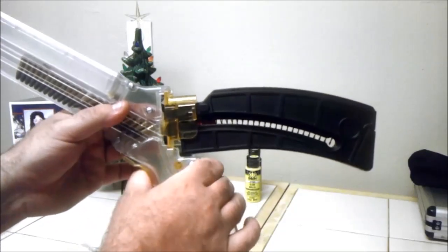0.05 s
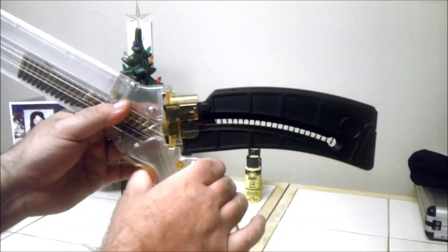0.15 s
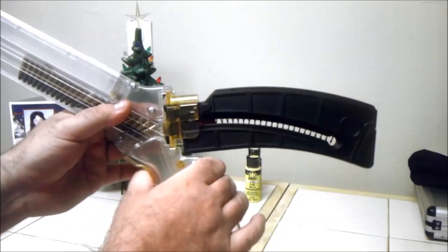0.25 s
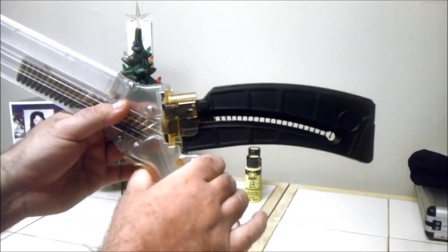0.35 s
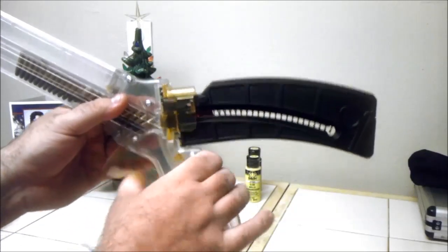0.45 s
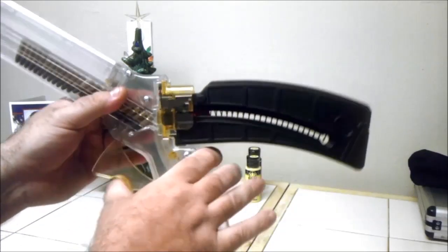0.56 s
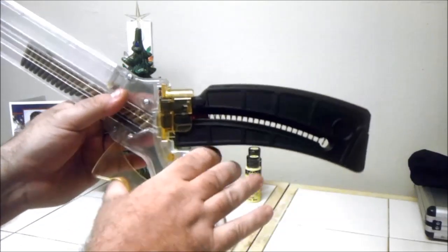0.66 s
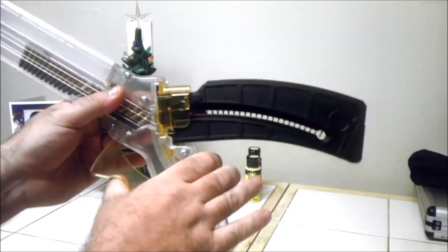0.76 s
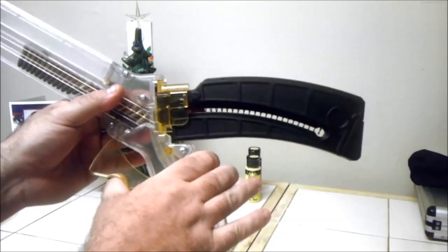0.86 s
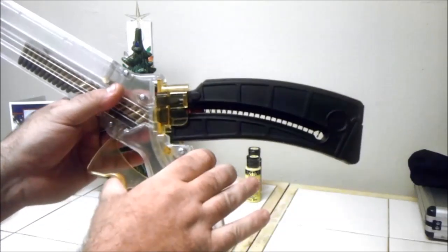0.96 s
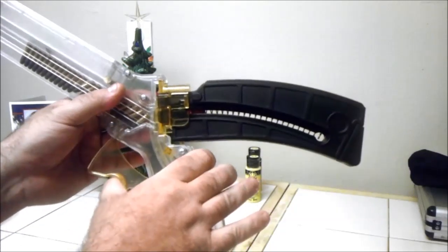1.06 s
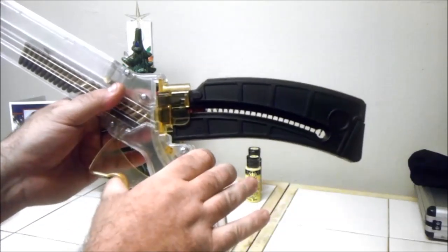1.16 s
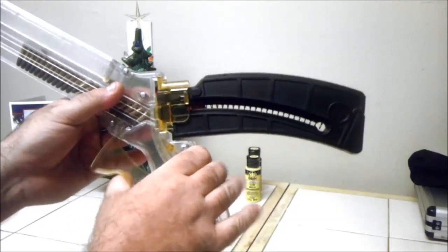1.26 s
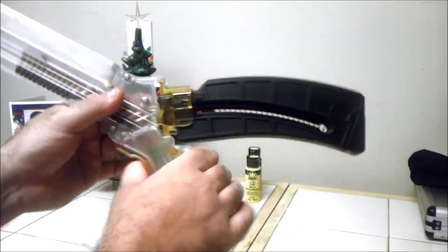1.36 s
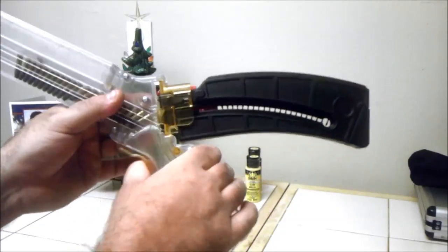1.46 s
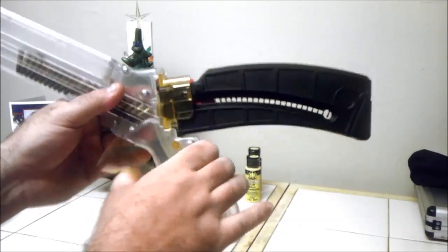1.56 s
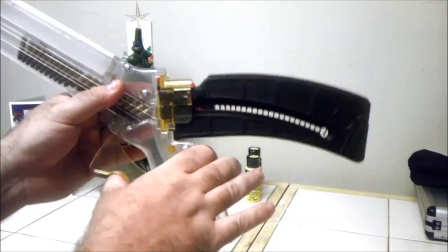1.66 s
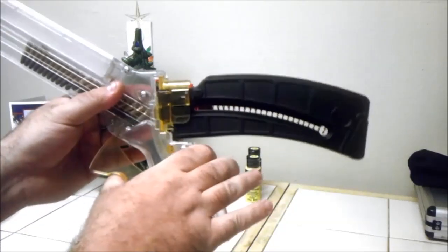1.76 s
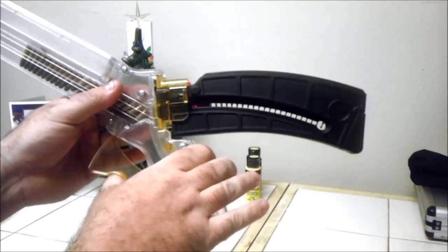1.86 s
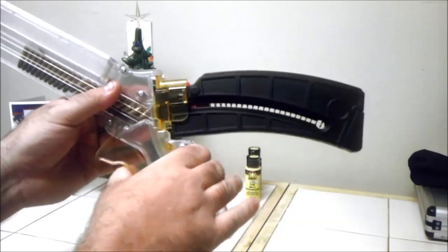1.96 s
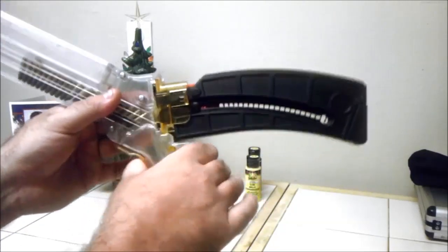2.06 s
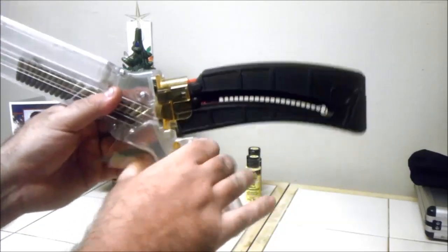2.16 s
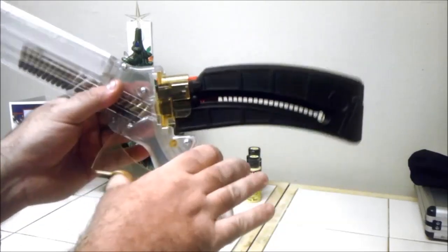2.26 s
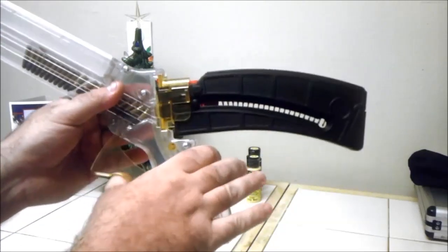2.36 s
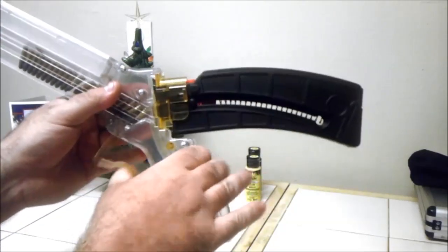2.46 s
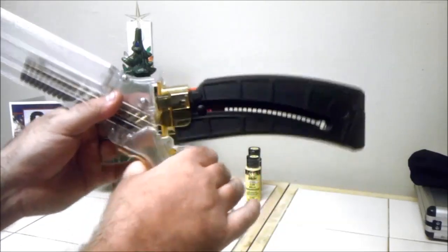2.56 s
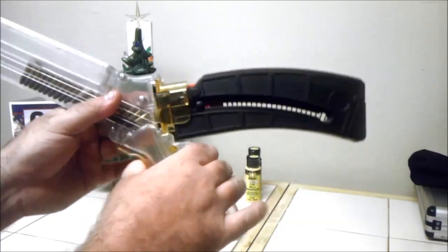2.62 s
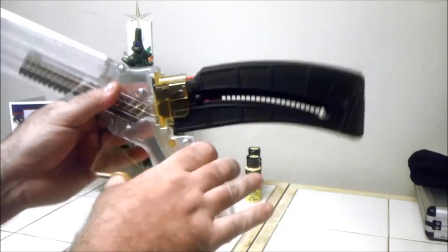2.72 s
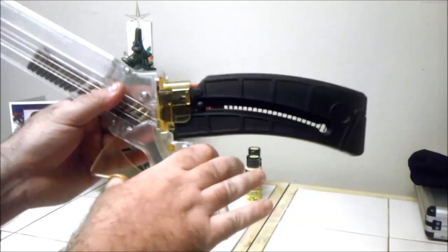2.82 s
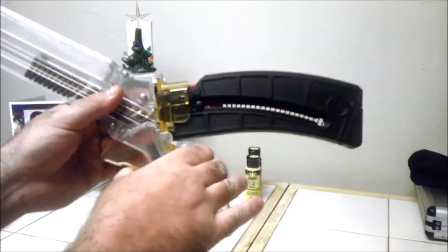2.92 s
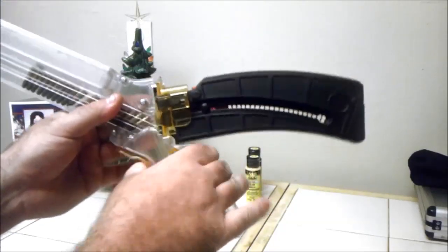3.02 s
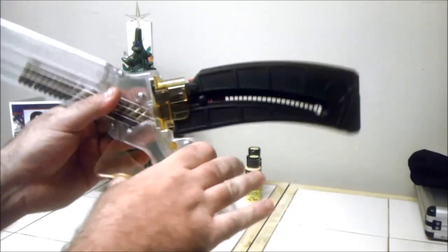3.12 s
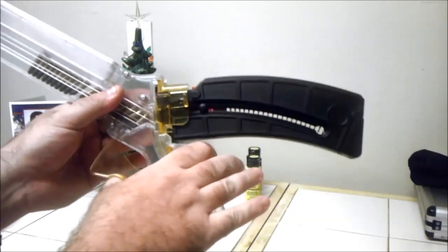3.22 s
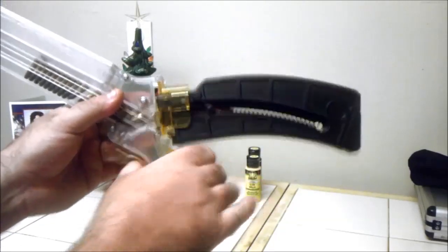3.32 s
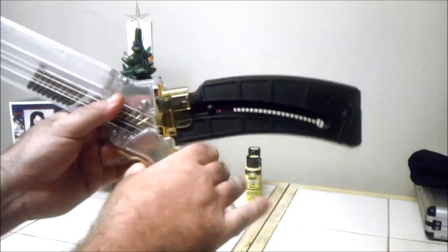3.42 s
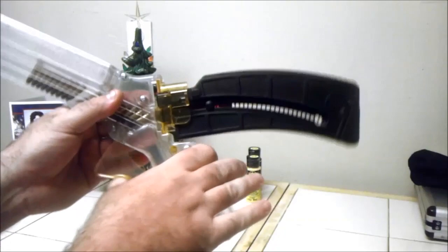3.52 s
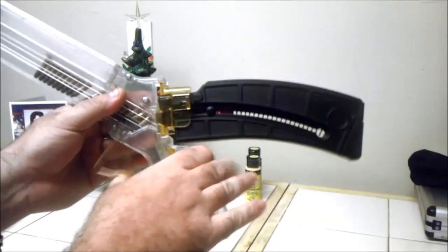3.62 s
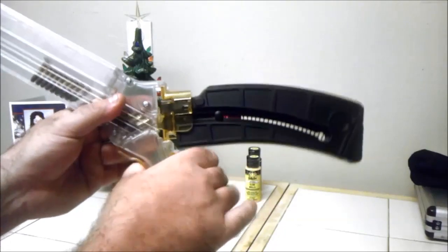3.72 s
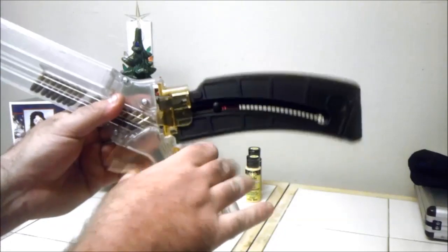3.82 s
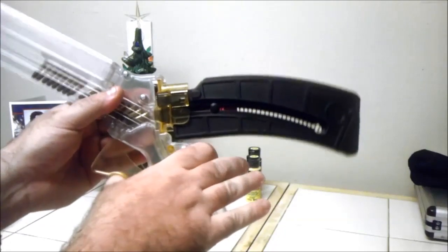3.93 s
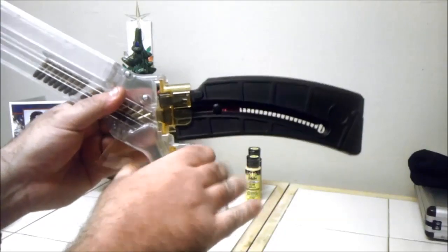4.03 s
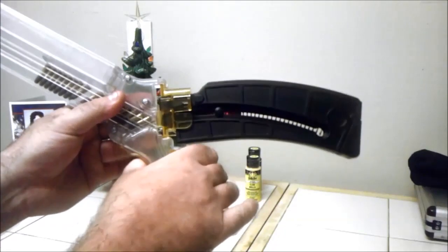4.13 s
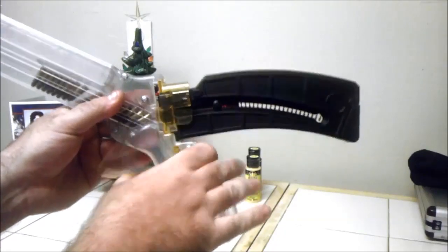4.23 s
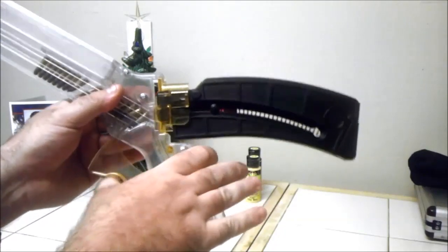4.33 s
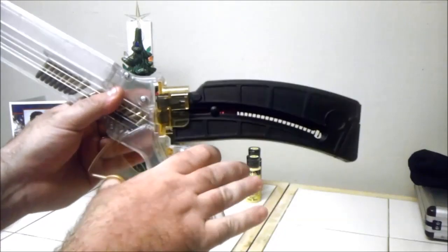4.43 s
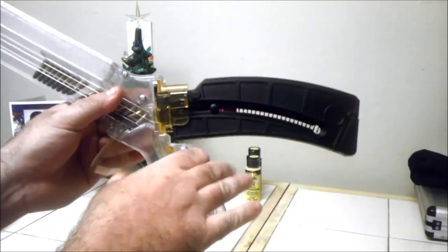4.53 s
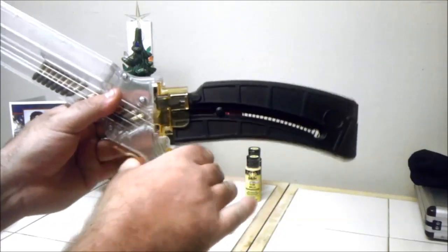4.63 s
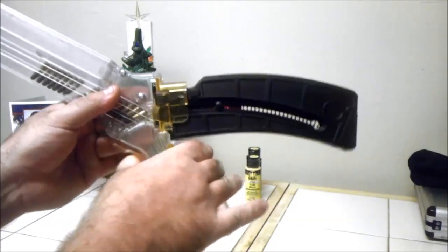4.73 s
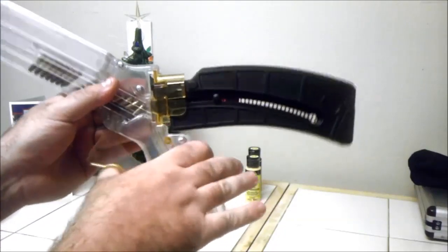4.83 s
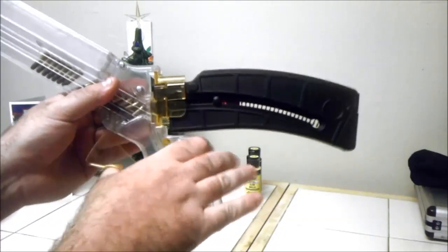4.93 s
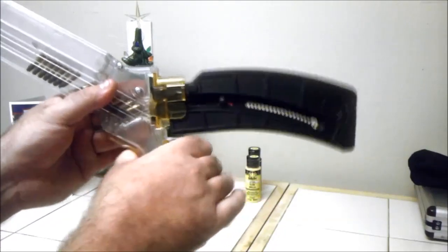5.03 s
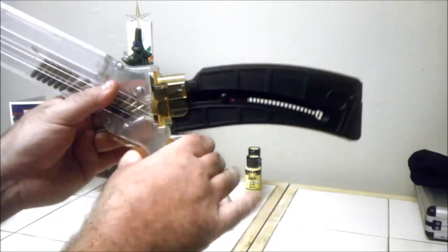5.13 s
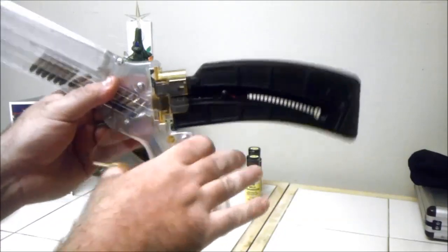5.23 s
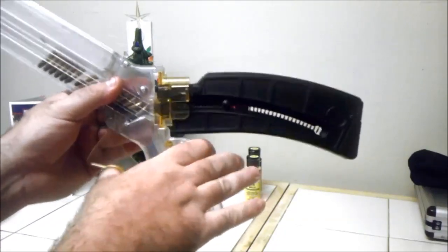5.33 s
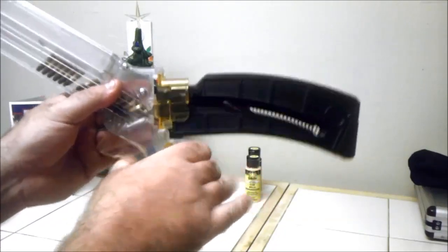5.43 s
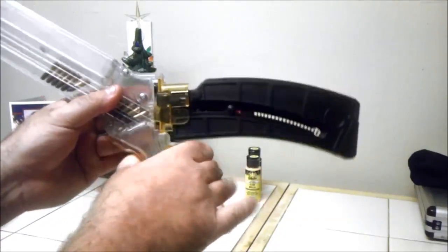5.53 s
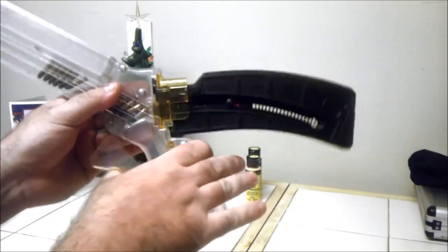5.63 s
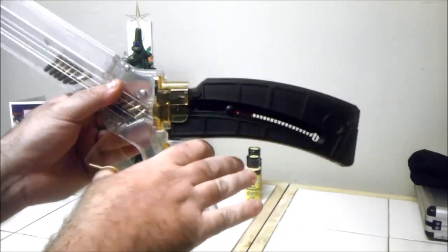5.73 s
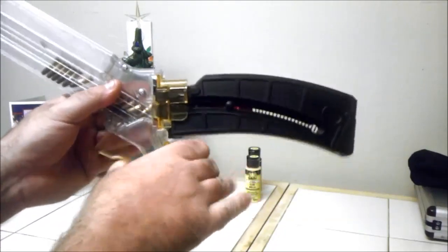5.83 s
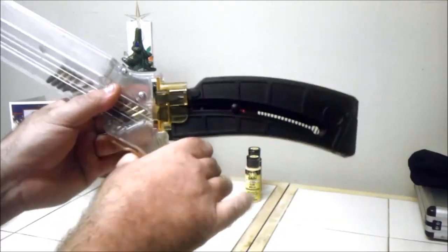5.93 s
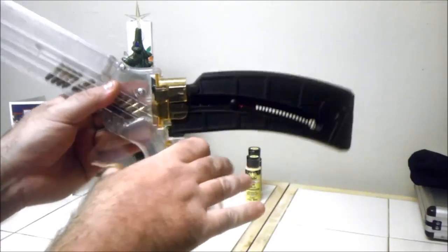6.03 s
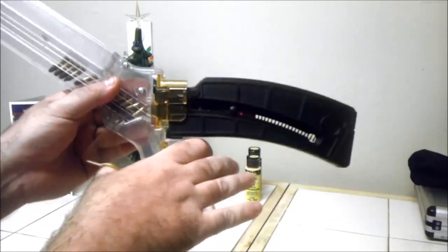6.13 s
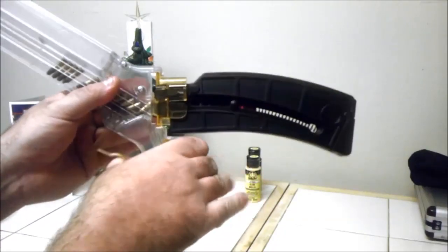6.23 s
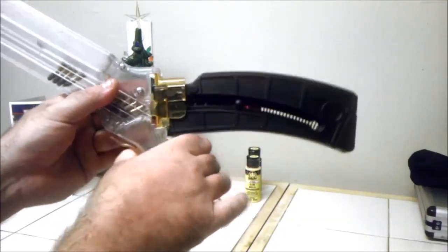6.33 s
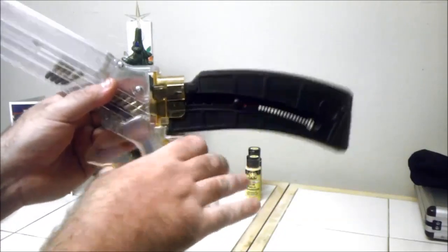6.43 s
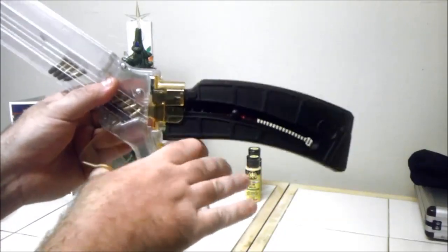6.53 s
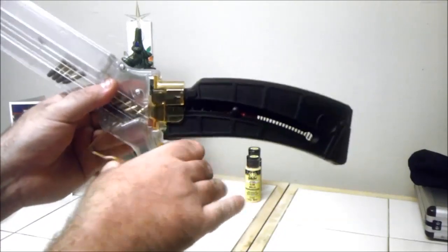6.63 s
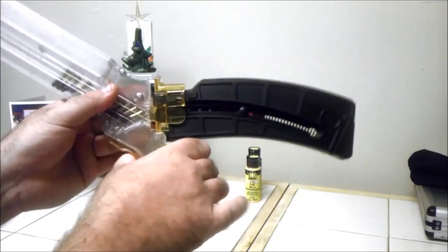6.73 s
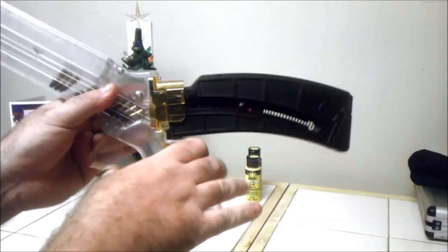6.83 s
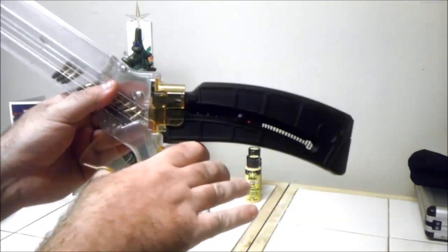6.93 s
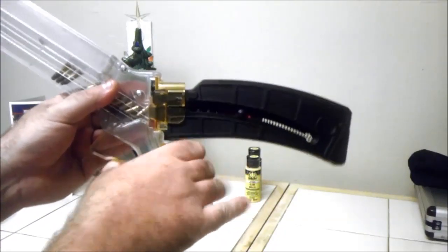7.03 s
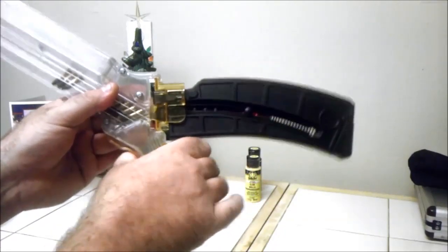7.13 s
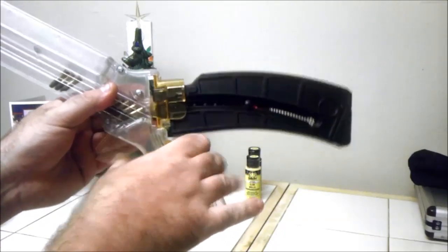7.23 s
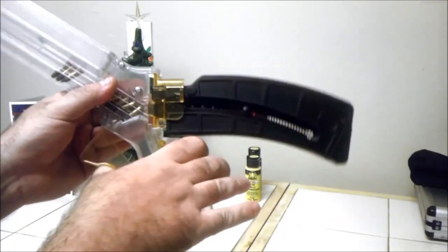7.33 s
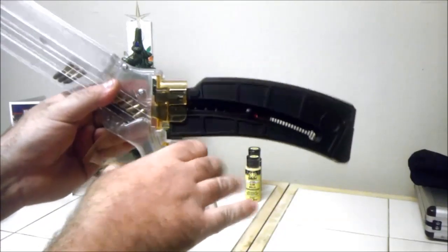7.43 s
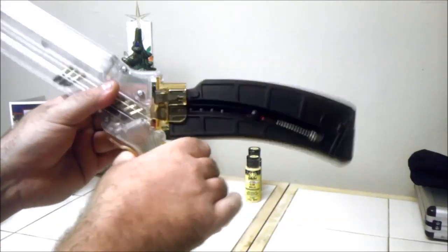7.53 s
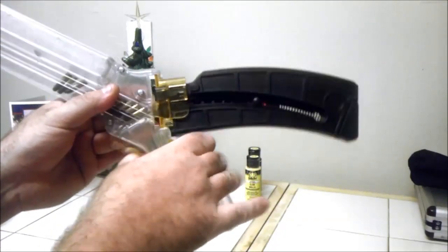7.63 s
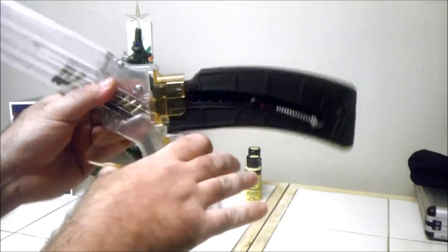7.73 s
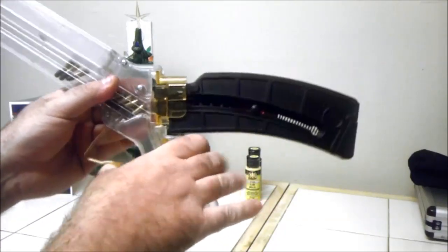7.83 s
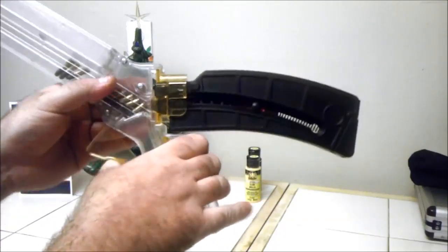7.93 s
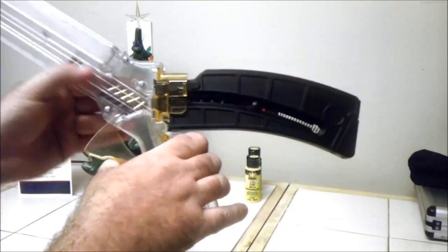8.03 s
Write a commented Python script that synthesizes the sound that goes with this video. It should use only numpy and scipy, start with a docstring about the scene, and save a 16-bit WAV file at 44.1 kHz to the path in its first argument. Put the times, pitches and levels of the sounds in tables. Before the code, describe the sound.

A plastic loading tool is worked by hand close to the microphone in a small tiled room. It opens with a faint rattle and a small cluster of handling clicks at about 0.5 seconds, then a short pause. At 1.4 seconds comes the first full stroke: the lever snaps over and, an instant later, a brass round is rammed into the magazine with a sharp, louder clack. More strokes follow at about 2, 2.6 and 3 seconds, then settle into an even rhythm, one roughly every 0.4 seconds, about fifteen in all. After each one the pusher scrapes faintly, the lever springs back with a duller knock, and loose rounds rattle and tick into line. The clacks have a short echo that cuts quickly to near silence. The last stroke lands around 7.5 seconds, with a few soft clicks fading by 8 seconds.

```python
"""In a small tiled room, close to two microphones, a hand squeezes a plastic loading tool again and again.
Each squeeze snaps the lever, rams a brass round home and clicks back: brief contacts that excite the
damped modes of the shell. The pusher scrapes back, and loose rounds rattle in the hopper. Reflections
and a low hum surround them; a limiter ducks the loud blows and a noise gate closes after each stroke."""
import sys
import numpy as np
from scipy import signal
from scipy.fft import rfft, irfft
from scipy.io import wavfile
from scipy.ndimage import uniform_filter1d

SR = 44100
rng = np.random.default_rng(int(sys.argv[2]) if len(sys.argv) > 2 else 0)


def output_pcm(signal):
    """Save a mono or channel-first signal as 16-bit PCM at the path in sys.argv[1].

    Samples are clipped to [-1, 1] before scaling.
    """
    pcm = np.clip(np.atleast_2d(signal).T, -1, 1) * 32767
    wavfile.write(sys.argv[1], SR, np.round(pcm).astype(np.int16))


N = 355887
LEAD, BLOCK = 4410, 2048  # samples: sounding before time zero, one blow or filter
EARLIER_S = -.05  # a clack before time zero leaves only its echo in the air
HZ = np.fft.rfftfreq(BLOCK, 1 / SR)
TIME_S = (np.arange(N + LEAD) - LEAD) / SR

# modes of the plastic shell, magazine and brass: pitch_hz, width_hz, level_db
SHELL_MODES = [(478, 23, -9), (780, 63, -9.5), (1021, 83, -3.5), (1590, 99, -7.5), (2090, 250, -9),
               (2180, 400, -6), (2940, 350, -9.5), (3350, 530, -5), (4280, 200, -7), (4870, 450, -1.5),
               (5560, 670, -7), (8150, 330, -7.5), (8730, 260, -12.5)]
# the round seats under the feed lips: start_s, level_db, pitch_hz, knock_db
SEATINGS = [(1.412, 4.5, 850, -6), (2.069, -2, 960, 5), (2.582, 5.5, 800, -6.5), (3.012, 4, 2020, -3),
            (3.391, 2, 820, -6), (3.757, 9, 1980, -13), (4.667, 7.5, 730, -9.5), (5.076, 5, 791, -8),
            (5.5, -3.5, 2000, -21), (5.909, 5.5, 1130, -13.5), (6.32, 7.5, 1620, -19),
            (6.722, -3.5, 1080, -11.5), (7.135, 8, 2000, -8.5), (7.561, 2, 1044, -20)]


def gain_of(db):
    """Amplitude grows tenfold for every 20 dB."""
    return 10 ** (np.asarray(db) / 20)


def unit_rms(x):
    """Normalisation to unit mean power."""
    return x / np.sqrt(np.mean(abs(x) ** 2) + 1e-20)


def curve(points, hz):
    """Interpolation along logarithmic frequency."""
    f, value = np.transpose(points)
    return np.interp(np.log(hz + 1), np.log(f + 1), value)


def coloured(x, db):
    """Linear-phase filtering by a gain in dB at each frequency of HZ."""
    taps = np.roll(irfft(gain_of(db)), BLOCK // 2, -1) * np.hanning(BLOCK)
    return signal.oaconvolve(x, taps, "same", axes=-1)


def shell(weights, click_db=0.5):
    """Modal superposition: the body's response is a bare click plus weighted, damped resonances."""
    hz, width, db = np.transpose(SHELL_MODES)[:, :, None]
    modes = gain_of(db) * width / (width + 2j * (HZ - hz))
    return gain_of(click_db) + weights @ modes


def impact(pitch_hz, knock_db, sizzle_db, contact_ms):
    """Impact excitation: a chattering contact rings the shell. Returns direct and room-bound sound."""
    chatter, spot = rng.standard_normal(BLOCK), rng.standard_normal(len(SHELL_MODES))
    progress = (np.arange(BLOCK) - 220) / SR / (contact_ms / 1000)
    creak = gain_of(-13.5) * np.exp(np.minimum(progress, 0))  # parts load up before they let go
    envelope = np.maximum(np.clip(progress * 3.44, 0, 1), creak) * np.exp(-progress ** 2)
    contact = rfft(chatter * envelope)
    contact /= uniform_filter1d(abs(contact), size=12) ** 0.43  # flatten the chatter's own peaks
    mode_hz = np.transpose(SHELL_MODES)[0]
    nearness = np.exp(-(np.log(mode_hz / pitch_hz) / 0.07) ** 2)
    weights = 0.93 * gain_of(2.5 * spot + 5 * nearness)  # modes near the struck pitch ring most
    tilt_db = curve([(1100, knock_db), (2400, -14), (3700, -14), (6200, sizzle_db)], HZ)
    focus = np.exp(-(np.log((HZ + 1) / pitch_hz) / 0.11) ** 2)
    beam_db = np.outer([8.5, 1.4], focus)  # the struck panel beams its pitch at the microphones
    rings = irfft(contact * shell(weights) * gain_of(tilt_db + beam_db))
    rings *= signal.windows.tukey(BLOCK, .1)
    energy = 0.056 * contact_ms * SR / 1000
    return rings / np.sqrt((rings ** 2).sum(1, keepdims=True) / energy)


def blows():
    """Superposition of impacts, each with a brief low thud. Returns direct, room-bound and thuds."""
    # handling: start_s, level_db, pitch_hz, knock_db (shell), sizzle_db (brass), thud_db, contact_ms
    clacks = [(EARLIER_S, 2.6, 4200, -24.5, -12, -60, 4), (.167, -14, 1430, -6.5, -15, -61, 6.8),
              (.514, -4, 1000, -18.5, -21, -38, 2.4), (.534, -6, 890, -6.5, -19, -42, 1.9),
              (.569, -5.5, 2860, -16, -20.5, -59, 1.7), (1.751, -6, 2300, -18, -17, -65, 4.5)]
    # the lever takes up its slack: start_s, level_db, pitch_hz
    ticks = [(.479, -17.5, 1500), (1.979, -20, 2980), (2.492, -20.5, 997), (2.933, -18, 2960),
             (3.327, -17.5, 3070), (4.074, -14, 2200), (4.086, -17, 3010), (4.56, -23, 2470),
             (5.004, -21, 2500), (5.432, -17, 2620), (7.898, -26.5, 1000)]
    # the lever snaps over: start_s, level_db, pitch_hz
    snaps = [(1.352, 1.5, 2900), (2.005, 1.5, 3010), (2.525, 0.5, 3000), (2.955, 0, 3100),
             (3.342, -1.5, 2950), (3.701, 1, 3040), (4.096, 1, 3010), (4.603, 1.5, 3090),
             (5.022, -0.5, 2880), (5.447, 2, 3120), (5.849, 0, 3120), (6.248, -1, 3160),
             (6.656, -0.5, 2960), (7.066, 0, 3020), (7.493, 0.5, 1890)]
    # parts rebound after the snap: start_s, level_db, pitch_hz, knock_db, sizzle_db
    rebounds = [(1.36, -12, 3060, -6, -6.5), (1.368, -5.5, 1030, -3, -15.5), (2.016, -2.5, 1820, -19, -6.5),
                (2.036, 0.5, 1030, -10.5, -13), (2.535, -4.5, 2900, -20, -15),
                (2.545, -11, 3120, -1.5, -28), (2.961, -3, 2700, -23, 0.5), (2.972, -3, 1010, -3.5, -5.5),
                (3.352, -2, 1030, -7.5, 1.5), (3.711, -0.5, 2320, -6.5, -12),
                (4.108, -1.5, 3400, -6.5, -12.5), (4.614, 2, 1085, -11.5, -3.5),
                (5.032, -1, 1000, -8.5, -4), (5.458, -4.5, 930, -3, -5), (5.858, -0.2, 990, -7, -2),
                (6.258, -2, 1630, 1, -2.5), (6.667, -1.2, 990, -8, -5), (7.075, -7, 1040, 0, -20),
                (7.499, 0.5, 1000, -10, -2.5), (7.533, -4, 1010, 1, -7)]
    # the pusher rams the round: start_s, level_db, pitch_hz, knock_db
    rams = [(1.401, 6.5, 1030, -23), (2.06, 9, 1530, -18), (2.572, 2, 1110, -16), (3.006, 8, 2730, -24.5),
            (3.385, 6.5, 2750, -12.5), (3.75, -0.5, 1950, -3), (4.66, -1.5, 1040, -11.5),
            (5.071, 7, 1890, -18.5), (5.493, 9.5, 1920, -11.5), (5.902, 6.5, 1060, -12),
            (6.311, 6, 904, -8.5), (6.715, 10, 1140, -10.5), (7.128, 5, 1210, -16.5),
            (7.555, 8.5, 1990, -10)]
    # the lever springs back with dull knocks: start_s, level_db, pitch_hz
    returns = [(1.534, -10.5, 1060), (1.576, -14.5, 940), (1.619, -12, 945), (2.221, -8.5, 1110),
               (2.248, -12.5, 970), (2.726, -8.5, 1020), (2.746, -18, 970), (3.142, -10, 990),
               (3.531, -15, 1080), (4.215, -22, 1080), (4.241, -4, 1060), (4.427, -22, 1280),
               (4.82, -10, 920), (5.221, -9, 1030), (5.626, -16, 1080), (6.036, -25.5, 1050),
               (6.455, -11, 970), (6.869, -10.5, 1010), (7.294, -15.5, 910), (7.719, -13, 1030)]
    # the next round clicks into line: start_s, level_db, pitch_hz
    drops = [(2.277, -11, 2240), (2.781, -16, 2900), (3.641, -16, 3010), (4.3, -11.5, 2010),
             (4.327, -11, 3010), (4.861, -11.5, 3050), (5.275, -8.5, 2390), (5.685, -11, 3090),
             (6.107, -9, 3090), (6.494, -8, 2220), (6.922, -12, 2340), (7.79, -14, 2950)]
    # each kind's tuple completes its rows to the seven columns of a clack
    kinds = [(ticks, (-12, -19, -57, 5)), (snaps, (-17, -15.5, -63.5, 5.5)), (rebounds, (-57, 4.6)),
             (rams, (-12.5, -48, 2.7)), (SEATINGS, (-10.5, -46, 4.4)), (returns, (-13, -19, -57, 4.6)),
             (drops, (-24, -18, -58, 3.3)), (clacks, ())]
    events = [tuple(row) + rest for rows, rest in kinds for row in rows]
    out, t = np.zeros((4, N + LEAD + BLOCK)), np.arange(BLOCK) / SR
    for start_s, level_db, pitch_hz, knock_db, sizzle_db, thud_db, contact_ms in events:
        direct, spread = impact(pitch_hz, knock_db, sizzle_db, contact_ms)
        spread *= gain_of(.3 * min(level_db, 0))  # light blows spread less into the room
        phases = rng.uniform(0, 2 * np.pi, (2, 1))
        push = 2.3 * np.sin(2 * np.pi * 55 * t + phases) * t / 0.0076 * np.exp(1 - t / 0.0028)
        at = round(start_s * SR) + LEAD - 245
        out[:, at:at + BLOCK] += gain_of(level_db) * np.vstack([direct, spread, gain_of(thud_db) * push])
    return out[0, :N + LEAD], out[1, :N + LEAD], out[2:, LEAD:N + LEAD]


def rattle(taps_per_s=450, swell_db_per_s=108, settle_db_per_s=148.5):
    """Shot noise: loose brass rounds tap the shell at random, swelling and settling with each shake."""
    # the rounds shake hardest as the lever is let go: peak_s, level_db
    shakes = [(0., -24), (1.56, -30), (2.19, -28), (2.69, -30.5), (3.08, -32), (3.52, -28.5), (3.88, -41.5),
              (4.2, -28.5), (4.78, -29.5), (5.18, -31), (5.619, -33.5), (6.03, -30.5), (6.45, -30.5),
              (6.8, -25), (7.28, -31.5), (7.69, -34)]
    # spectral tilt of the taps: frequency_hz, gain_db
    tilt = [(200, -8), (800, 4), (3000, -0.5), (8500, 3.5), (14000, 1)]
    chance, side, size = rng.random((3, N + LEAD))
    taps = (chance < taps_per_s / SR) * np.sign(side - .5) * gain_of(-2.5 * np.log(size + .03))
    ringing = signal.oaconvolve(taps, irfft(shell(np.full(len(SHELL_MODES), 1.7))))[:N + LEAD]
    peak_s, level_db = np.transpose(shakes)[:, :, None]
    since = TIME_S - peak_s
    shake_db = level_db + np.where(since < 0, swell_db_per_s, -settle_db_per_s) * since
    return gain_of(shake_db.max(axis=0)) * unit_rms(coloured(ringing, curve(tilt, HZ)))


def hum(level_db=-42.5):
    """Stationary noise: the room's low background is partly coherent between the microphones."""
    # spectrum of the background: frequency_hz, gain_db
    spectrum = [(35, -64), (60, -27), (227, -6.5), (395, -5), (1530, -11.5), (1740, -16), (1990, -14),
                (12000, -36.5), (15600, -59.5), (22000, -120)]
    common, separate = rng.standard_normal((2, N))
    pair = np.array([common, .4 * common + .9 * separate])
    return gain_of(level_db) * unit_rms(coloured(pair, curve(spectrum, HZ)[None]))


def scrape(length_s=.15, rise_s=.02, slips_per_s=600, low_hz=698, high_hz=1056, width_hz=136):
    """Stick-slip friction: the withdrawing pusher rings a hollow channel whose resonance climbs."""
    seat_s = np.transpose(SEATINGS)[0]
    since = TIME_S - seat_s[np.maximum(np.searchsorted(seat_s, TIME_S) - 1, 0)]
    travel = np.clip(since / length_s, 0, 1)
    chance, size = rng.random((2, N + LEAD))
    slips = (chance < slips_per_s / SR) * np.log(size + .01) * rng.choice([-1., 1.], N + LEAD)
    hollow_hz = low_hz + (high_hz - low_hz) * travel ** 2.17
    phasor = np.exp(2j * np.pi * np.cumsum(hollow_hz) / SR)
    pole = np.exp(-np.pi * width_hz / SR)
    ringing = unit_rms((phasor * signal.lfilter([1 - pole], [1, -pole], slips / phasor)).real)
    envelope = np.clip(since / rise_s, 0, 1) * np.clip((1 - travel) * 6.4, 0, 1)
    return gain_of(-29 - 7 * travel) * envelope * ringing


def bump(start_s=2.316, pitch_hz=320, t60_s=.12, rise_s=.015):
    """Damped oscillation: one soft, low bump dies away exponentially."""
    t = np.maximum(np.arange(N) / SR - start_s, 0)
    return gain_of(-28 - 60 * t / t60_s) * np.minimum(t / rise_s, 1) * np.sin(2 * np.pi * pitch_hz * t)


def early_echoes(x):
    """Early reflections: the tiled table and near wall add eight delayed copies at each microphone."""
    taps = np.zeros((2, 600))
    taps[:, 0] = 1
    delays = rng.integers(12, 600, (2, 8))
    np.put_along_axis(taps, delays, gain_of(-9) * rng.choice([-1., 1.], delays.shape), 1)
    return signal.oaconvolve(x[None], taps / np.linalg.norm(taps[0]), axes=1)[:, :len(x)]


def reverberation(x, paths=3, build_s=.012):
    """Diffuse field: each band decays at its own rate; the paths crossfade as the hands move."""
    # reverberation time of the tiled room: frequency_hz, t60_s
    decay = [(150, 0.31), (500, 0.52), (1500, 0.41), (4000, 0.64), (6500, 0.48), (8500, 0.58),
             (11000, 0.44), (14000, 0.37)]
    # left-right likeness of the field: frequency_hz, coherence
    likeness = [(60, 0.13), (180, 0.93), (540, 0.82), (1630, 0.2), (4910, 0.21), (14800, 0.12)]
    out, drift = 0, np.arange(len(x)) / SR * 1.3
    for k in range(paths):
        hz, t, noise = signal.stft(rng.standard_normal((2, SR)), SR, nperseg=256)
        coherence = np.clip(curve(likeness, hz), 0, 1)[:, None]
        noise[1] = coherence * noise[0] + np.sqrt(1 - coherence ** 2) * noise[1]
        tail = signal.istft(noise * gain_of(-60 * t / curve(decay, hz)[:, None]), SR, nperseg=256)[1]
        tail *= np.minimum(np.arange(tail.shape[1]) / SR / build_s, 1)
        tail /= np.linalg.norm(tail[0])
        share = np.cos(np.pi * (drift + k / paths)) * np.sqrt(2 / paths)
        out = out + signal.fftconvolve((x * share)[None], tail, axes=1)[:, :len(x)]
    return out


def scene():
    """Superposition: direct sound, early echoes and reverberation sum at two coloured microphones."""
    # response of microphone and body together: frequency_hz, gain_db
    response = [(35, -57), (60, -34), (417, -13.5), (468, -8), (524, -13.5), (705, -6), (1020, -3),
                (1400, -3.5), (1970, -4.5), (2530, -5.5), (2970, -7), (6900, -12.5), (8480, -7),
                (14000, -21)]
    # imbalance of the pair: frequency_hz, left_minus_right_db
    balance = [(60, 2.5), (110, -6), (200, -2.5), (380, 0), (690, -1.5), (1280, 1), (2360, -2.5), (4350, 3),
               (8020, -6), (14800, -6)]
    direct, spread, thuds = blows()
    rounds, pusher = rattle(), scrape()
    near = early_echoes(direct + gain_of(-1.5) * rounds + pusher)
    diffuse = reverberation(gain_of(2) * spread + gain_of(-5.5) * (rounds + pusher))
    microphones_db = 11.79 + curve(response, HZ) + np.outer([.5, -.5], curve(balance, HZ))
    return coloured(near + diffuse, microphones_db)[:, LEAD:] + thuds + bump() + hum()


def peak_hold(db, db_per_s):
    """Peak detection: follows every rise at once and sinks at a set speed."""
    fall = np.arange(len(db)) * db_per_s / SR
    return np.maximum.accumulate(db + fall) - fall


def low_pass(x, edge_hz):
    """Band limiting: a windowed sinc removes the treble above the edge."""
    return signal.oaconvolve(x, signal.firwin(511, edge_hz, window=("kaiser", 9), fs=SR)[None], "same")


def record(dry, limit_db=-18, gate_db=-24, lag_s=.04):
    """Dynamic range control: limiter and noise gate read the incoming level; overload rounds the peaks."""
    dry = low_pass(dry, edge_hz=14150)  # the microphones' treble ends here
    level_db = 10 * np.log10(abs(uniform_filter1d((dry ** 2).mean(0), 130)) + 1e-12)
    over_db = np.maximum(peak_hold(level_db, db_per_s=200) - limit_db, 0)
    pole = np.exp(-1 / (lag_s * SR))  # the limiter lags, so each blow passes and its echo is ducked
    over_db = signal.lfilter([1 - pole], [1, -pole], over_db)
    under_db = peak_hold(np.clip(4.1 * (level_db - gate_db), -91, 0), db_per_s=133.4)
    levelled = dry * gain_of(2 + uniform_filter1d(under_db, 150) - .5 * over_db)
    clipped = levelled / (1 + levelled ** 4) ** .25
    return low_pass(clipped, edge_hz=15380)


dry = scene()
out = record(dry)
output_pcm(out)
```